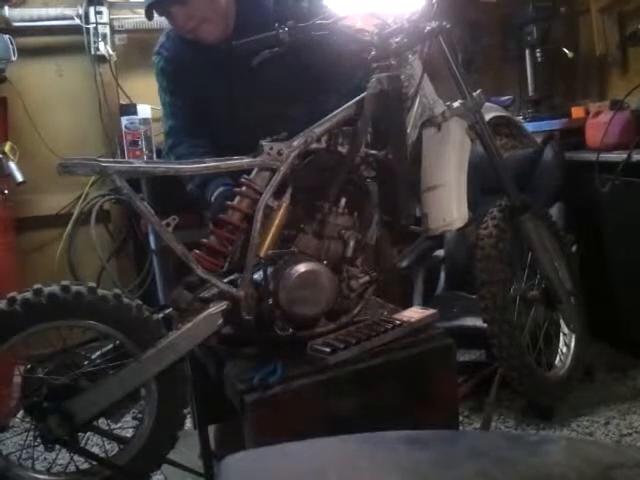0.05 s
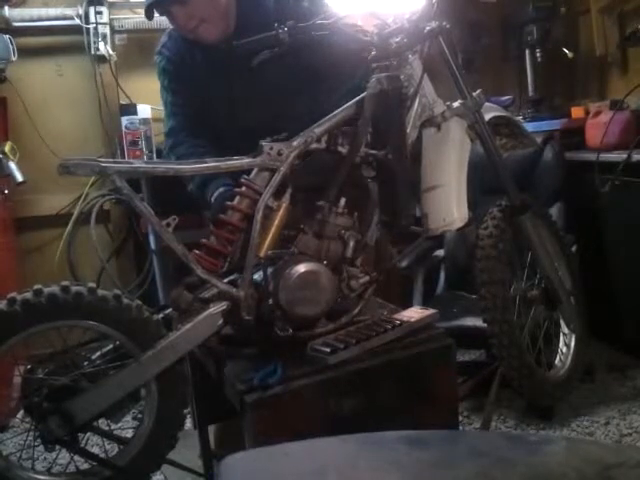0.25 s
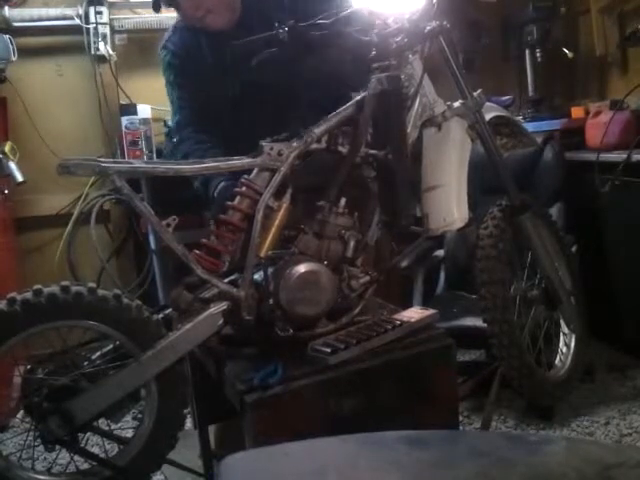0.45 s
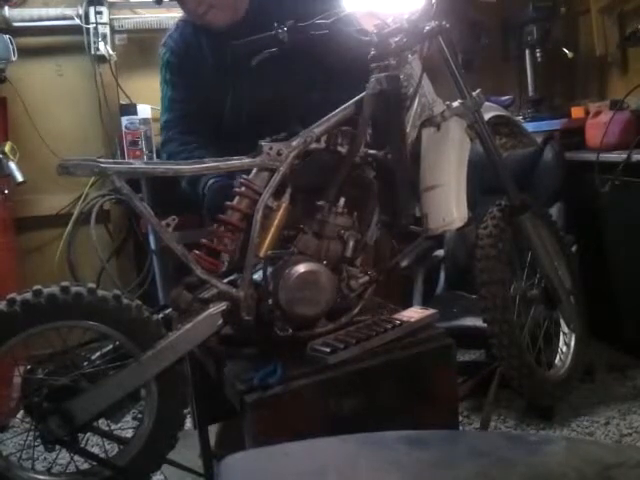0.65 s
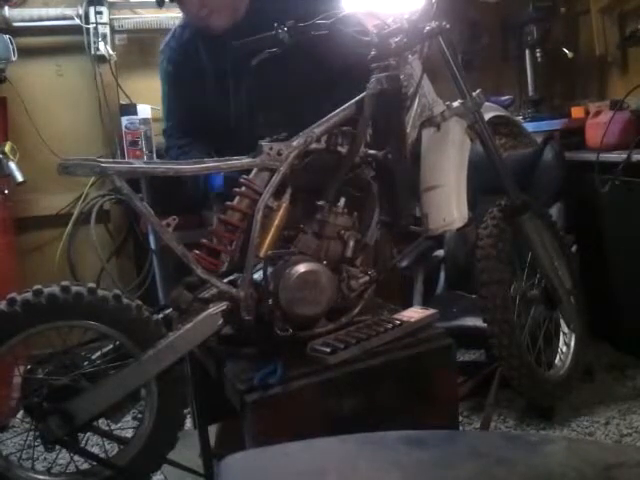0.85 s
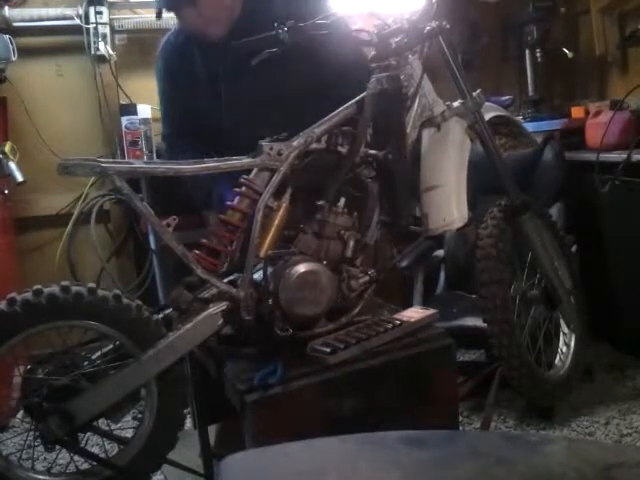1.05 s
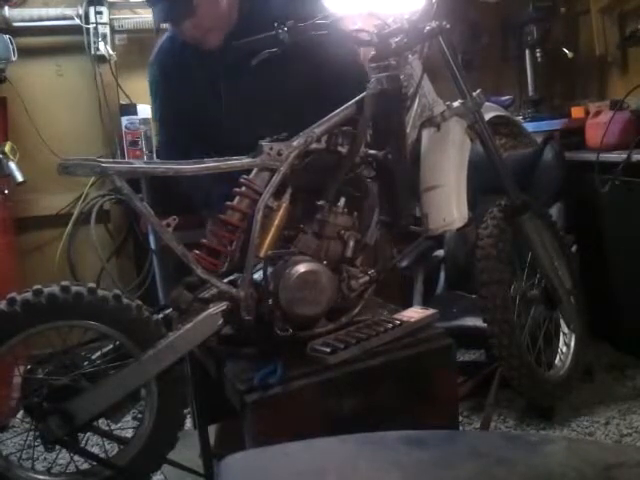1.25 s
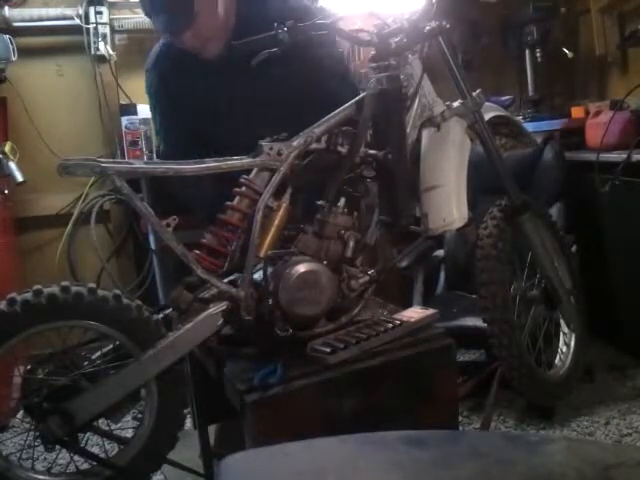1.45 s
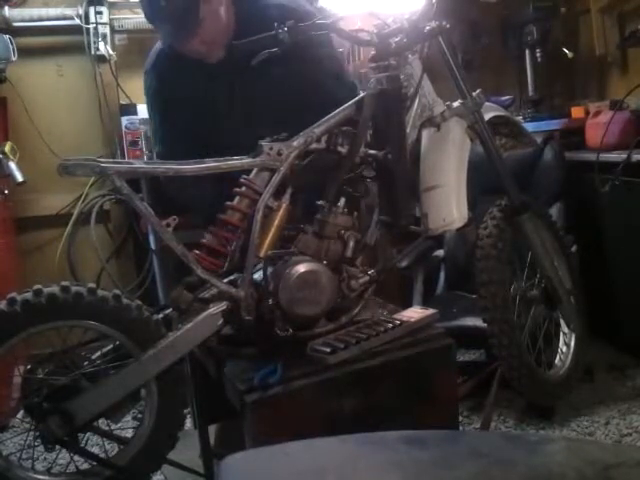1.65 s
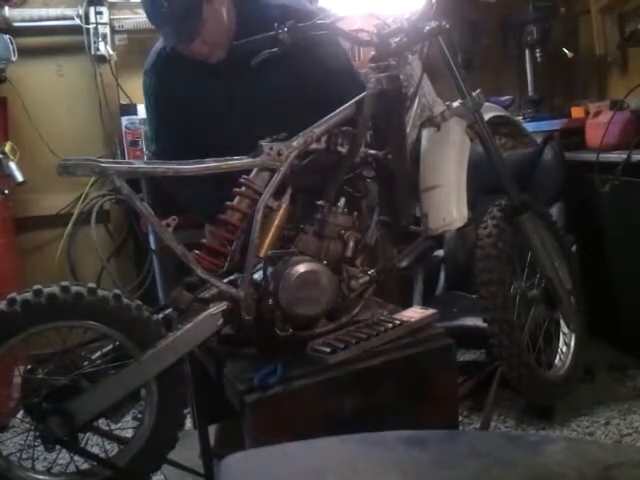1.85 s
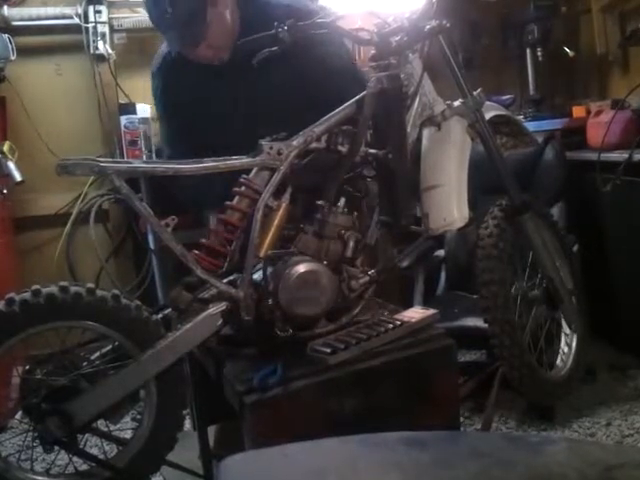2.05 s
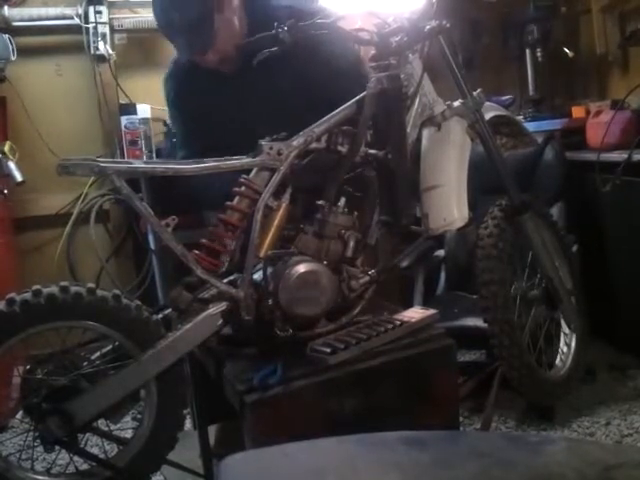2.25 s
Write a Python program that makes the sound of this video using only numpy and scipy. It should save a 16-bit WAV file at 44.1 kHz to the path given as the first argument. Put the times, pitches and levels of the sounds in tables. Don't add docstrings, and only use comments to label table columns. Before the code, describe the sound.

Metal hand tool on a motorbike: a faint scrape at 0.22 s leads into a loud, bright snap at 0.26 with quick rebounds, then a clear tick at 0.41. Dull far knocks follow at 0.56, 0.85 and 1.09. A tiny ping at 1.54, ringing clinks and frame bumps around 1.62, ticks with a jolt at 1.72, faint tap at 1.97. Soft sleeve rustle, wavering low hum, short garage reflections.

```python
import sys
import numpy as np
from scipy import signal
from scipy.fft import rfft, irfft
from scipy.io import wavfile
from scipy.ndimage import uniform_filter1d

SR = 44100
rng = np.random.default_rng(int(sys.argv[2]) if len(sys.argv) > 2 else 0)


def gain_from_decibels(decibels):
    exponent = np.asarray(decibels, float) / 20
    return 10 ** exponent


def store_pcm(level_fs):
    pcm = np.round(np.clip(level_fs, -1, 1) * 32767).astype(np.int16)
    wavfile.write(sys.argv[1], SR, np.atleast_2d(pcm).T)


N = 101429

# frequency [Hz], level [dB], t60 [s].
SOCKET_MODES = [(1478, 0, .11), (1520, -3, .1), (2068, -1, .09), (2125, -1, .09), (2342, -8, .07),
                (2918, -10, .1), (3780, -9, .04), (4490, -7, .05), (4690, -9, .16), (5250, -6, .05),
                (6150, 0, .035), (5660, -7, .04), (6710, -1, .035), (910, -9, .08)]
# frequency [Hz], level [dB], t60 [s].
PAWL_MODES = [(5900, 0, .05), (6490, -3, .04), (5340, -5, .05), (4840, -10, .08), (3850, -4, .03),
              (3300, -10, .03)]
# frequency [Hz], level [dB], t60 [s].
NUT_MODES = [(4050, -1, .12), (4200, 0, .14), (4370, -2, .12), (6300, 1, .07), (6000, -4, .06),
             (3000, -12, .05)]
# frequency [Hz], level [dB], t60 [s].
PIN_MODES = [(6370, 0, .06), (4300, -12, .1), (5400, -10, .1), (2100, -16, .08)]
# frequency [Hz], level [dB], t60 [s].
SHANK_MODES = [(5502, 0, .8), (3225, -8, 1.5)]
# frequency [Hz], level [dB], t60 [s].
SPANNER_MODES = [(4430, 0, 1.0), (3250, -12, .12), (6315, -12, .12), (6800, -6, .08), (2040, -11, .3)]
# frequency [Hz], level [dB], t60 [s].
FRAME_MODES = [(635, 0, .12), (760, -1, .1), (840, -5, .1)]
# frequency [Hz], level [dB], t60 [s].
STAND_MODES = [(440, 0, .1), (225, -3, .14), (360, -4, .1), (520, -5, .08), (2080, -20, .06)]
# frequency [Hz], level [dB], t60 [s].
BENCH_MODES = [(440, 0, .12), (760, -5, .1), (225, -8, .12)]

# frequency [Hz], density [dB per Hz].
SNAP_COLOUR = [(200, -14), (450, 3.5), (1000, -34), (1700, 0.5), (3300, -1), (4600, -0.5), (6300, 8),
               (9000, 1.5)]
# frequency [Hz], density [dB per Hz].
SLIDE_COLOUR = [(200, -0.5), (600, -2.5), (1200, -3), (2200, -13.5), (3200, -8), (5700, 1), (9000, -12.5)]
# frequency [Hz], density [dB per Hz].
TICK_COLOUR = [(150, -23.5), (1500, -21), (2800, -7.5), (4000, -9), (6000, 4.5), (7200, 2.5), (8000, -26)]
# frequency [Hz], density [dB per Hz].
THUD_COLOUR = [(200, -14), (450, -8), (700, 0), (1000, -8), (2200, -16), (3500, -20), (8000, -34)]
# frequency [Hz], density [dB per Hz].
JOLT_COLOUR = [(100, -19), (400, 7), (900, 1.5), (2300, -18), (3200, -17), (8000, -29)]
# frequency [Hz], density [dB per Hz].
FAR_COLOUR = [(150, -4), (440, 0), (900, -3), (1500, -9), (2500, -9), (3000, -22), (8000, -34)]

# start [s], contact noise [dB], ring [dB], contact t60 [s].
SNAPS = [
    (.2611, -12, -21.5, 0.045),
    (.278, -19.5, -58, 0.016),
    (.293, -27.5, -40, 0.038),
]
# start [s], contact noise [dB], ring [dB], contact t60 [s].
SLIDES = [
    (.2172, -32, -50, 0.047),
    (.2240, -32, -57, 0.07),
    (.2295, -39, -45.5, 0.037),
    (.239, -61, -82, 0.03),
]
# start [s], contact noise [dB], ring [dB], contact t60 [s].
TICKS = [
    (.012, -54, -84, .05),
    (.4142, -38, -32.5, 0.048),
    (1.713, -47.5, -74.5, 0.064),
    (1.725, -42, -57, 0.054),
    (1.745, -51.5, -66.5, 0.12),
]
# start [s], contact noise [dB], ring [dB], contact t60 [s].
TAPS = [
    (1.972, -51.5, -55, 0.087),
]
# start [s], contact noise [dB], ring [dB], contact t60 [s].
PINGS = [
    (1.542, -49.5, -49.5, 0.09),
]
# start [s], contact noise [dB], ring [dB], contact t60 [s].
CHIMES = [
    (1.621, -58, -57, .05),
]
# start [s], contact noise [dB], ring [dB], contact t60 [s].
CLINKS = [
    (1.619, -51, -80, .1),
    (1.628, -56, -52.5, .1),
    (1.668, -56, -80, .04),
]
# start [s], contact noise [dB], ring [dB], contact t60 [s].
BUMPS = [
    (1.620, -47, -44, 0.046),
    (1.632, -39, -39.5, 0.048),
]
# start [s], contact noise [dB], ring [dB], contact t60 [s].
JOLTS = [
    (.255, -39, -38.5, 0.23),
    (1.714, -46, -37, 0.031),
    (1.726, -44.5, -51.5, 0.14),
]
# start [s], contact noise [dB], ring [dB], contact t60 [s].
KNOCKS = [
    (.561, -46, -42.5, .14),
    (.848, -46, -45, 0.077),
    (.885, -53.5, -57, 0.15),
    (1.089, -45.5, -49, 0.056),
]
# start [s], length [s], level [dB], centre [Hz].
RUSTLES = [
    (0.508, 0.15, -58, 7300),
    (0.61, 0.72, -65, 7900),
    (1.25, 0.13, -60, 5900),
    (1.99, 0.35, -65, 5900),
    (0.17, 0.39, -46, 860),
]
# multiple of the shaft rate, level [dB rms].
HUM = [(2, -59), (3, -52), (4, -58), (5, -76.5), (7, -63), (13, -82.5)]
# frequency [Hz], density [dB per Hz].
AIR_COLOUR = [(25, -19), (55, -0.5), (130, -4), (170, -11.5), (1000, -21.5), (3000, -34), (6300, -35),
              (8000, -39.5)]


def unit(x):
    return x / np.sqrt(np.mean(x ** 2))


def coloured(points, size):
    hz, db = np.array(points, float).T
    f = np.maximum(np.fft.rfftfreq(size, 1 / SR), 1)
    low_cut = np.minimum(f / hz[0], 1) ** 3
    gain = gain_from_decibels(np.interp(np.log(f), np.log(hz), db)) * low_cut
    return unit(irfft(rfft(rng.standard_normal(size)) * gain, size))


def walk(rate_hz):
    steps = rng.standard_normal(200)
    hold = int(SR / rate_hz)
    held = np.repeat(steps[:N // hold + 1], hold)
    return 1.03 * uniform_filter1d(uniform_filter1d(held, hold), hold)[:N]


def fade(t, t60_s):
    t = np.maximum(t, 0)
    return (1 - np.exp(-t / .0003)) * 1000. ** (-t / t60_s)


def strike(blows, modes, colour, rattle=.45):
    rattle_s = .006
    t, out = np.arange(N) / SR, np.zeros((2, N))
    hz, db, t60_s = np.array(modes, float).T[:, :, None]
    grit = coloured(colour, size=N)
    for start_s, noise_db, ring_db, contact_t60_s in blows:
        level_luck_db, phase = rng.standard_normal((2, len(modes), 1))
        jitter = rng.standard_normal((len(modes), SR // 2))
        shake = uniform_filter1d(jitter, int(rattle_s * SR)) * np.sqrt(rattle_s * SR)
        first = int(start_s * SR)
        span = slice(first, first + SR // 2)
        u = t[span] - start_s
        waver = 1 + rattle * np.clip(u / rattle_s, 0, 1) * shake[:, :len(u)]
        ring = gain_from_decibels(db + level_luck_db) * fade(u, t60_s) * np.sin(2 * np.pi * hz * u + phase) * waver
        out[0, span] += gain_from_decibels(ring_db) * ring.sum(0)
        out[1, span] += gain_from_decibels(noise_db) * fade(u, contact_t60_s) * grit[span]
    return out


def tools():
    grip_s, grip_t60_s = 1.732, .14
    t = np.arange(N) / SR
    grip = 1000. ** (-np.maximum(t - grip_s, 0) / grip_t60_s)
    ratchet = strike(SNAPS, SOCKET_MODES, SNAP_COLOUR) + strike(SLIDES, SOCKET_MODES, SLIDE_COLOUR)
    ratchet += strike(TICKS, PAWL_MODES, TICK_COLOUR)
    small = strike(TAPS, NUT_MODES, TICK_COLOUR) + strike(PINGS, PIN_MODES, TICK_COLOUR)
    small += strike(CHIMES, SHANK_MODES, TICK_COLOUR, rattle=.15)
    spanner = grip * strike(CLINKS, SPANNER_MODES, SLIDE_COLOUR, rattle=.06)
    heavy = strike(BUMPS, FRAME_MODES, THUD_COLOUR) + strike(JOLTS, STAND_MODES, JOLT_COLOUR)
    far = strike(KNOCKS, BENCH_MODES, FAR_COLOUR)
    return ratchet + small + spanner + heavy + far


def garage(ring, contact):
    low_t60_s, high_t60_s, gap_s = 0.27, 0.18, 0.0067
    wet_db, ring_send_db = -1.5, -8
    t = np.arange(SR // 2) / SR - gap_s
    noise = rng.standard_normal(len(t))
    low = signal.lfilter(*signal.butter(2, 2500, fs=SR), noise)
    tail = low * fade(t, low_t60_s) + (noise - low) * fade(t, high_t60_s)
    tail = tail / np.sqrt(np.sum(tail ** 2))
    wet = signal.fftconvolve(contact + gain_from_decibels(ring_send_db) * ring, tail)[:N]
    return ring + contact + gain_from_decibels(wet_db) * wet


def rustle():
    t, out = np.arange(N) / SR, 0
    for start_s, length_s, db, hz in RUSTLES:
        band = coloured([(hz / 3, -25), (hz / 2, -9), (hz, 0), (hz * 2, -14)], size=N)
        swell = np.sin(np.pi * np.clip((t - start_s) / length_s, 0, 1))
        out = out + gain_from_decibels(db + 2 * walk(44.1)) * swell * band
    return out


def motor():
    shaft_hz, drone_hz, drone_db = 31.87, 54.6, -55
    turn = 2 * np.pi * np.cumsum(shaft_hz * (1 + 0.006 * walk(3.35))) / SR
    hum = sum(gain_from_decibels(db + 2.5 * walk(8)) * np.sin(k * turn + 6 * rng.random()) for k, db in HUM)
    drone_level = gain_from_decibels(drone_db + 6.3 * walk(11))
    drone_phase = 2 * np.pi * np.cumsum(drone_hz * (1 + 0.042 * walk(18))) / SR
    return np.sqrt(2) * (hum + drone_level * np.sin(drone_phase))


def air():
    level_db = -48.5 + 0.27 * walk(1.5) + 0.4 * walk(6.1)
    return gain_from_decibels(level_db) * coloured(AIR_COLOUR, size=N)


def scene():
    ring, contact = tools()
    return (garage(ring, contact) + rustle() + motor() + air())[None]


def low_pass(x):
    return signal.sosfilt(signal.butter(12, 8210, fs=SR, output="sos"), x)


def record(dry):
    top_hz, leak_db, offset = 6950, -45, -.007
    cut = signal.sosfilt(signal.cheby1(9, .5, top_hz, fs=SR, output="sos"), dry)
    leak = signal.lfilter(*signal.butter(1, 8000, fs=SR), dry)
    return low_pass(cut + gain_from_decibels(leak_db) * leak + offset)


dry = scene()
out = record(dry)
store_pcm(out)
```